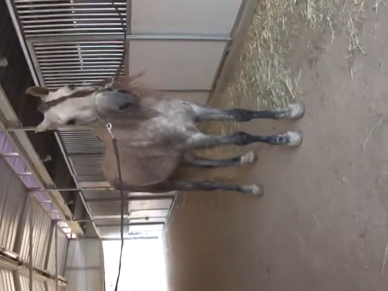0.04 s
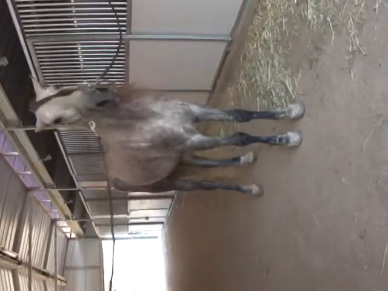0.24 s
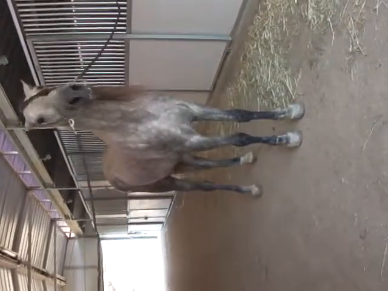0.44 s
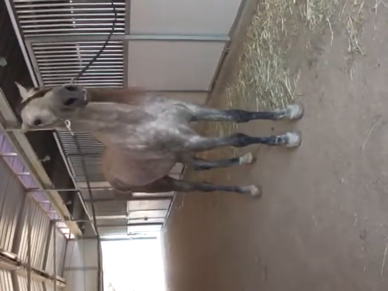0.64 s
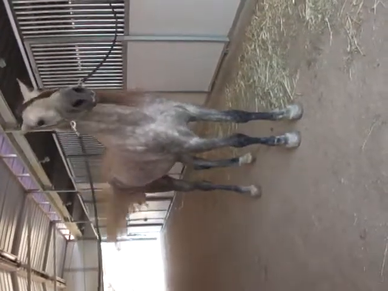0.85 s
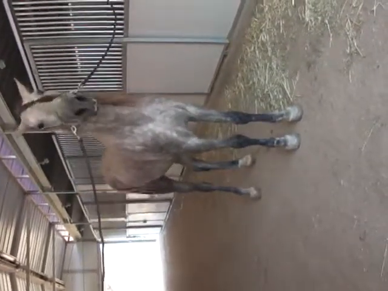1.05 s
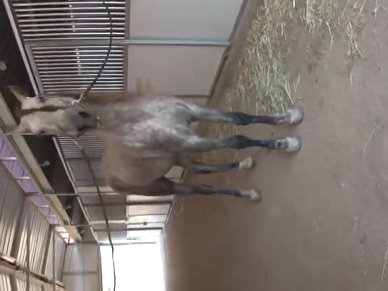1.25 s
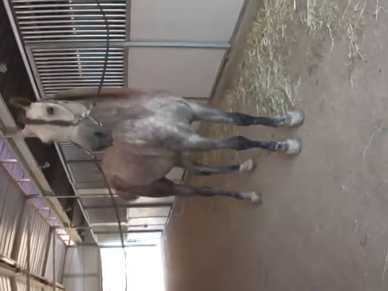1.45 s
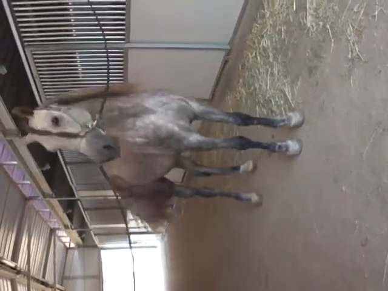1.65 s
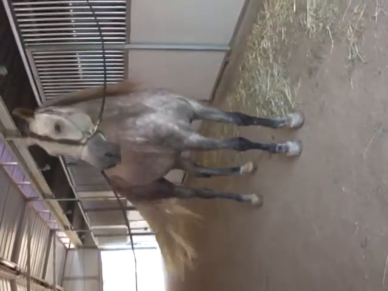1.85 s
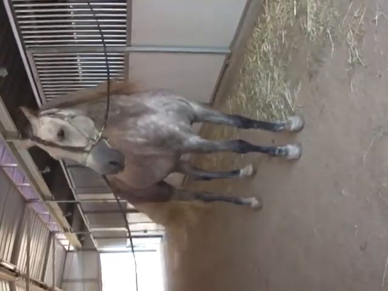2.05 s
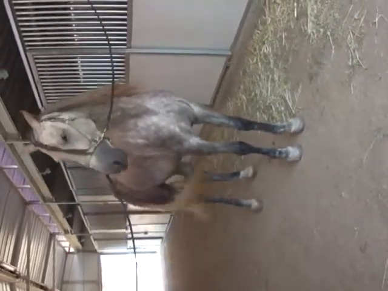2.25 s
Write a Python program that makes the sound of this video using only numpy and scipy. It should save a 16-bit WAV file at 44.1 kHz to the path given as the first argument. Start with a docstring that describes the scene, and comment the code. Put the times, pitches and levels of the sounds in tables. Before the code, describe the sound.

A horse whinnies a few metres away in a stable aisle, starting at about 0.2 seconds. A high squeal and a lower, rough tone shake together about seven times a second, settling into a short, low nicker from 1.2 to 1.5 seconds. Soft nostril blows overlap the nicker and come again near 1.7 and 2.2 seconds. The aisle echoes briefly, with faint background noise throughout.

```python
"""A high, shaking squeal rises over a faint background: a horse whinnies in a stable aisle, a few metres off.
Its voice box sounds two pitches at once, the squeal and a lower, rough voice. They shake together about
seven times a second and settle into a nicker, a short, low chuckle. Soft blows of air through the
nostrils follow, and the aisle echoes."""
import sys
import numpy as np
from scipy import signal
from scipy.fft import rfft, irfft
from scipy.io import wavfile
from scipy.ndimage import uniform_filter1d, minimum_filter1d

SR = 44100
rng = np.random.default_rng(int(sys.argv[2]) if len(sys.argv) > 2 else 0)


def generate_wav(signal):
    """Clip the signal to [-1, 1] and save it as 16-bit WAV at the path in sys.argv[1]."""
    frames = np.transpose(np.atleast_2d(signal))
    scaled = np.clip(frames, -1, 1) * 32767
    pcm = np.round(scaled).astype(np.int16)
    wavfile.write(sys.argv[1], SR, pcm)


N = 105840
TOP_HZ = 11050  # upper edge of the sound


def undb(db):
    """Turn decibels into a number to multiply by."""
    return 10 ** (np.asarray(db) / 20)


def curve(table, column=1):
    """One column of a table, joined by straight lines in time."""
    rows = np.array(table)
    return np.interp(np.arange(N) / SR, rows[:, 0], rows[:, column])


def unit(x):
    """Scale to an average strength (rms) of 1."""
    return x / np.sqrt(np.mean(x ** 2))


def steady(x, size=900):
    """Even out the strength so it stays near 1 from moment to moment."""
    power = uniform_filter1d(uniform_filter1d(x ** 2, size), size)
    return x / np.sqrt(np.abs(power) + 1e-12)


def noise():
    """White noise: an even hiss."""
    return rng.standard_normal(N)


def wander(per_s):
    """Drift between random values, per_s of them each second."""
    return unit(np.interp(np.arange(N) / SR * per_s, np.arange(N), noise()))


def colour(x, points):
    """Shape the tone with (frequency [Hz], level [dB]) points."""
    hz, db = np.array(points).T
    bins = np.maximum(np.fft.rfftfreq(4096, 1 / SR), 1)
    gain = undb(np.interp(np.log(bins), np.log(hz), db))
    # build the filter so that it rings only after a sound, never before
    cepstrum = irfft(np.log(gain))
    half = len(cepstrum) // 2
    one_sided = cepstrum * np.r_[1, np.full(half - 1, 2), np.zeros(half)]
    response = irfft(np.exp(rfft(one_sided)))
    return signal.fftconvolve(x, response)[:N]


def split(x, hz):
    """The parts below and above a frequency."""
    low = signal.sosfiltfilt(signal.butter(4, hz, fs=SR, output="sos"), x)
    return low, x - low


# tone of the background (frequency [Hz], level [dB])
BACKGROUND_TONE = [(15, -65), (25, -32), (85, -14.5), (156, -6.5), (241, -4), (274, -2.5), (311, -7),
                   (344, -1.5), (468, -3), (588, -1.5), (668, -5.5), (907, -4), (1080, -7), (1170, -4.5),
                   (1630, -12.5), (2210, -9.5), (11000, -30), (14300, -66), (22000, -120)]
# the background dips under the call (time [s], level [dB])
BACKGROUND_LEVEL = [(0, -39.5), (.19, -40.5), (.27, -46.5), (1.25, -40.5), (1.6, -44), (2.1, -45),
                    (2.4, -43)]


def background():
    """Faint, slightly wavering noise of the stable and the yard outside."""
    return unit(colour(noise(), BACKGROUND_TONE)) * undb(curve(BACKGROUND_LEVEL) + 0.2 * wander(9.02))


def early_echoes(x, decay_s=0.0076, evenness=0.63):
    """Quick echoes from floor and stalls join the sound, blurring it and colouring it a little."""
    t = np.arange(N) / SR
    echoes = unit(noise() * np.exp(-t / decay_s)) / np.sqrt(N)
    response = rfft((t == 0) + echoes, 2 * N)
    response /= np.abs(response) ** evenness  # at 1 the echoes would add no colour
    response /= np.sqrt(np.mean(np.abs(response) ** 2))
    return irfft(rfft(x, 2 * N) * response)[:N]


def aisle(x, low_fade_s=0.72, treble_fade_s=0.39, tail_db=-7.5, delay_s=0.0084):
    """Sound bounces around the aisle: quick echoes, then a dense tail whose treble dies first."""
    t = np.arange(N) / SR
    low, treble = split(noise(), 3100)
    tail = (low * undb(-60 * t / low_fade_s) + treble * undb(-60 * t / treble_fade_s)) * (t > delay_s)
    return early_echoes(x) + undb(tail_db) * signal.fftconvolve(x, unit(tail))[:N] / np.sqrt(N)


# puffs of air (start [s], rise [s], hold [s], fade [s], body level [dB], hiss level [dB])
BLOWS = [(1.249, 0.036, .02, .06, -36, -43), (1.392, 0.017, 0.01, 0.035, -40, -55),
         (1.67, 0.02, 0.076, 0.061, -38, -48.5), (2.146, 0.052, 0.079, 0.077, -37, -80)]
# tone of a puff's hollow body (frequency [Hz], level [dB])
BLOW_BODY = [(47, -50), (80, -24), (234, -4.5), (375, -3), (416, -5), (756, 0.5), (821, -3), (1520, -4),
             (1910, -15.5), (3330, -15), (11000, -48), (14300, -62), (22000, -120)]
# tone of its thin hiss (frequency [Hz], level [dB])
BLOW_HISS = [(2000, -20), (4500, 3), (8000, 2), (11000, -4.5)]


def nostril_blows():
    """Air rushes through the fluttering nostrils: a hollow body and a thin hiss."""
    t, out = np.arange(N) / SR, 0
    body = unit(colour(noise(), BLOW_BODY)) * undb(1.8 * wander(70))
    hiss = unit(colour(noise(), BLOW_HISS))
    for start, rise, hold, fade, body_db, hiss_db in BLOWS:
        swell = np.clip((t - start) / rise, 0, 1)
        dying = np.exp(-np.maximum(t - start - rise - hold, 0) / fade)
        out = out + swell * dying * (undb(body_db) * body + undb(hiss_db) * hiss)
    return out


# deep chest tone, before its boost (time [s], level [dB])
CHEST_LEVEL = [(.22, -41), (.3, -45), (.385, -35), (.43, -35), (.58, -28.5), (.66, -39), (.735, -34),
               (.79, -52), (.87, -28.5), (.94, -40.5), (1.01, -49), (1.08, -37), (1.25, -31), (1.34, -31),
               (1.42, -55)]
# brief grunts (middle [s], half length [s], level [dB])
GRUNTS = [(0.453, 0.019, -33.5), (0.579, 0.014, -27), (1.183, .02, -47), (1.305, 0.047, -40.5)]


def chest(phase, boost_db=5):
    """The deepest tone of the low voice, with brief grunts an octave below."""
    t = np.arange(N) / SR
    tone = np.cos(phase) * undb(curve(CHEST_LEVEL) + boost_db)
    grunt_gain = sum(undb(db) * np.exp(-((t - at) / half) ** 2) for at, half, db in GRUNTS)
    return tone + grunt_gain * np.cos(phase / 2 + .4 * wander(80))


# how throat and nose ring with the mouth open (frequency [Hz], level [dB])
OPEN_THROAT = [(59, -68), (100, -39), (252, -24), (278, -5.5), (319, -4.5), (381, -18), (532, -20.5),
               (611, -9), (758, -11), (941, -13.5), (1120, 1), (1190, -4), (1390, -3.5), (1800, -6.5),
               (1990, -0.5), (2240, -33), (2520, -7), (2830, -21.5), (3190, -6.5), (3960, -22),
               (4820, -14.5), (6100, -28.5), (7280, -20.5), (8350, -35.5), (11000, -39), (14300, -86),
               (22000, -120)]
# how they ring as the mouth closes for the nicker (frequency [Hz], level [dB])
NICKER_THROAT = [(90, -63), (280, -9), (400, 2), (560, -21.5), (740, 0.5), (850, -2), (980, -1), (1130, 2),
                 (1270, -5.5), (1410, -1), (1700, -5.5), (1950, -17.5), (2250, -46.5), (2550, -10.5),
                 (2850, -24), (3350, -10.5), (4000, -36), (4700, -30), (6000, -38), (7200, -34),
                 (11000, -40)]


def throat(source, nicker_at_s=1.16, closing_s=.04):
    """Throat and nose favour some frequencies; these change as the mouth closes."""
    closed = np.clip((np.arange(N) / SR - nicker_at_s) / closing_s, 0, 1)
    open_voice = steady(colour(source, OPEN_THROAT))
    nicker = steady(colour(source, NICKER_THROAT))
    return np.sqrt(1 - closed) * open_voice + np.sqrt(closed) * nicker


def vocal_fold(phase, hz, fall_db, count):
    """A vibrating fold in the voice box makes a tone and overtones, fall_db weaker each octave."""
    return sum(undb(-fall_db * np.log2(k)) * np.cos(k * phase) * (k * hz < TOP_HZ)
               for k in range(1, count + 1))


LOW_JITTER, SQUEAL_JITTER = 0.02, 0.0093  # pitch wobble, as a share of the pitch with the rasp at 0 dB
FLUTTER, THROB = 0.6, 0.34  # fast and slower unevenness in loudness
SQUEAL_CHOP, RASP_CHOP = 0.93, 0.63  # how strongly the low voice chops each one
THIN_FROM_HZ, THIN_SPAN_HZ = 385, 70  # pitch range over which the low voice loses its rumble
RUMBLE_HZ, RASP_CUT_HZ, BASS_CUT_HZ = 430, 270, 143  # lower edges: thinned voice, rasp, whole call
# the two pitches of the voice box (time [s], low voice [Hz], squeal [Hz])
PITCH = [(.18, 852, 792), (.2, 845, 956.5), (.222, 827, 1159), (.242, 692.4, 1440), (.275, 570.4, 1448),
         (.3, 460.2, 1202), (.318, 475, 1171), (.352, 535.5, 1410), (.385, 514.8, 1401), (.41, 344.5, 1130),
         (.465, 305, 1116), (.505, 352.6, 1122), (.56, 300.6, 1100), (.585, 258.7, 900), (.61, 350.7, 1070),
         (.645, 447.6, 1260), (.672, 419.1, 1260), (.695, 333, 1125), (.728, 291.3, 1130),
         (.755, 410, 1240), (.778, 488.9, 1467), (.805, 479.8, 1445), (.85, 314.1, 1163),
         (.885, 318.9, 1120), (.922, 437, 1376), (.948, 424.4, 1398), (.985, 307.9, 1121),
         (1.025, 305.3, 1133), (1.07, 465, 1378), (1.105, 420, 1380), (1.14, 300, 1147), (1.18, 276, 1128),
         (1.21, 286.2, 1131), (1.275, 283.9, 1127), (1.3, 234.1, 1102), (1.325, 279.7, 1103),
         (1.42, 281.8, 1118)]
# the mix of the voice (time [s], squeal [dB], low voice [dB], rasp [dB])
VOICE_MIX = [(.18, -23, -30, -20), (.265, 6, -13, -15), (.3, -3, -10, -11), (.38, -1, -10, -11.5),
             (.44, -4, -5.5, -3.5), (.53, -8.5, -10.5, -7), (.59, -8, -5, -1.5), (.66, 0.5, -1.5, -6),
             (.73, -8, -5, -6), (.79, -2, 0.5, -11.5), (.86, -8.5, -0.5, -4), (.935, 0.5, -6, -6.5),
             (1, -9.5, -4, -5), (1.09, 1.5, -5, -5.5), (1.18, -4, -8, 3.5), (1.205, -17, -8, -17.5),
             (1.24, -16.5, -1, -15.5), (1.265, -13, -10.5, 0), (1.305, 2.5, -4, -9),
             (1.335, -23, 4.5, -6.5), (1.42, -30, -1.5, -2.5)]
# rise and fall of the call, before boost, fades and throb (time [s], body [dB], treble [dB])
CALL_LEVEL = [(0.17, -35, -44), (0.198, -24, -43), (0.22, -14, -28), (0.266, -9, -23.5),
              (0.28, -24.5, -22.5), (0.314, -9, -19.5), (0.328, -25.5, -19.5), (0.406, -14, -20),
              (0.418, -17, -35.5), (0.506, -15, -23), (0.558, -19.5, -36.5), (0.588, -22, -27),
              (0.596, -15.5, -25), (0.676, -16.5, -17), (0.71, -16.5, -42), (0.736, -17.5, -22),
              (0.822, -20, -19.5), (0.844, -20, -29.5), (0.922, -18, -21), (0.954, -20.5, -19.5),
              (1.006, -16, -30), (1.092, -18.5, -16), (1.14, -17, -37), (1.158, -21, -29),
              (1.17, -9, -42.5), (1.18, -28, -35), (1.202, -14.5, -20.5), (1.318, -27, -58),
              (1.454, -33, -61), (1.5, -46, -52)]
# tone of the breathy rasp (frequency [Hz], level [dB])
RASP_TONE = [(1500, -2), (3500, -1.5), (7500, -2.5), (10000, 4)]


def whinny(treble_from_hz=2073, boost_db=0.5):
    """Squeal, low pulses and rasp pass through the throat; more rasp makes the voice less steady."""
    squeal_gain, low_gain, rasp_gain = (undb(curve(VOICE_MIX, column=k)) for k in (1, 2, 3))
    low_pitch = curve(PITCH, column=1)
    low_hz = low_pitch * (1 + LOW_JITTER * rasp_gain * wander(500))
    squeal_hz = curve(PITCH, column=2) * (1 + SQUEAL_JITTER * rasp_gain * wander(500))
    low_phase, squeal_phase = (2 * np.pi * np.cumsum(hz) / SR for hz in (low_hz, squeal_hz))
    flutter = np.exp(FLUTTER * rasp_gain * wander(220))
    throb = np.exp(THROB * np.sqrt(rasp_gain) * wander(110))

    pulses = vocal_fold(low_phase, low_hz, fall_db=0.37, count=26) * flutter
    squeal = vocal_fold(squeal_phase, squeal_hz, fall_db=4.5, count=8)
    squeal *= 1 + SQUEAL_CHOP * low_gain * np.cos(low_phase)
    breath = colour(noise(), RASP_TONE) * np.exp(RASP_CHOP * np.cos(low_phase)) * flutter
    rasp = split(breath, RASP_CUT_HZ)[1]
    mix = squeal_gain * throat(squeal) + low_gain * throat(pulses) + rasp_gain * throat(rasp)

    body, treble = split(mix, treble_from_hz)
    thin = np.clip((low_pitch - THIN_FROM_HZ) / THIN_SPAN_HZ, 0, 1)
    body = body - thin * split(body, RUMBLE_HZ)[0]
    body = steady(body) * undb(curve(CALL_LEVEL, column=1) + boost_db)
    treble = steady(treble) * undb(curve(CALL_LEVEL, column=2) + boost_db)
    fades = curve([(.175, 0.051), (.2, 0.84), (1.37, 0.94), (1.46, 0.077)])
    call = fades * throb * (body + treble + chest(low_phase) * flutter)
    return split(call, BASS_CUT_HZ)[1]


def scene():
    """The horse in the aisle, over the background."""
    return (aisle(whinny() + nostril_blows()) + background())[None]


def record(dry, ceiling=0.655, react_s=.004):
    """A limiter briefly turns down the loudest peaks, and the highest treble is cut."""
    span = int(react_s * SR)
    needed_gain = ceiling / np.maximum(np.abs(dry), ceiling)
    gain = uniform_filter1d(minimum_filter1d(needed_gain, span), span)
    treble_cut = signal.ellip(12, .2, 80, TOP_HZ, fs=SR, output="sos")
    return signal.sosfilt(treble_cut, dry * gain)


dry = scene()
out = record(dry)
generate_wav(out)
```